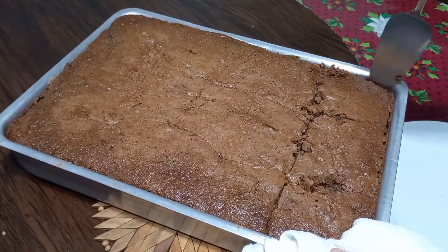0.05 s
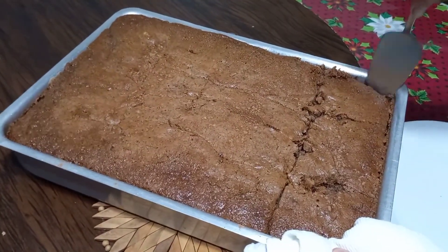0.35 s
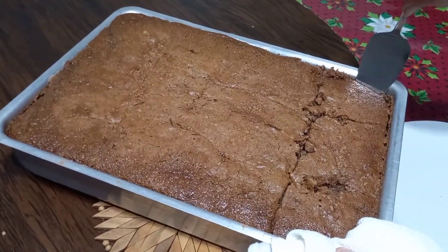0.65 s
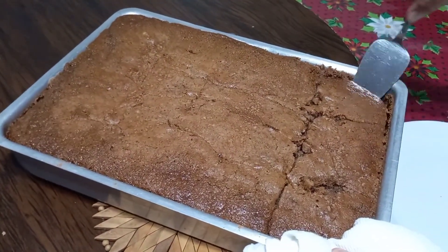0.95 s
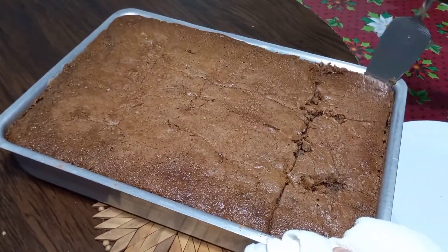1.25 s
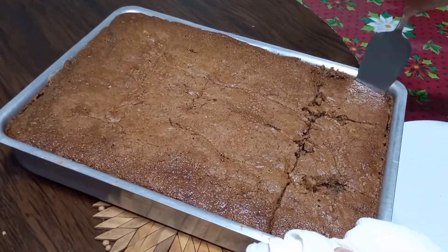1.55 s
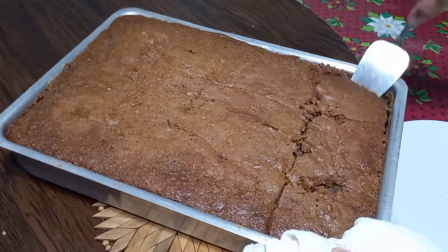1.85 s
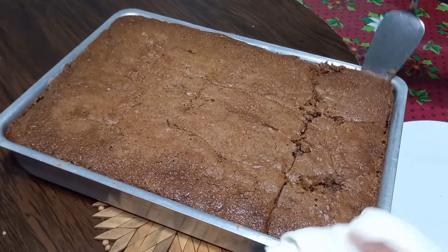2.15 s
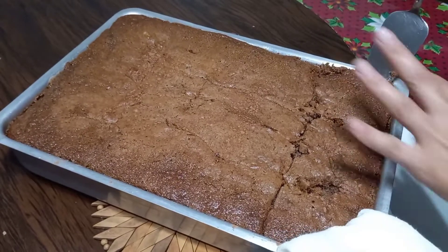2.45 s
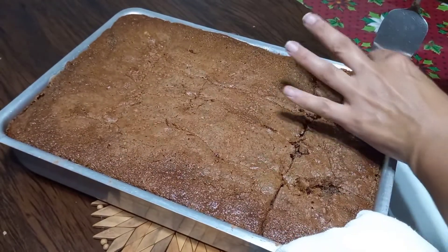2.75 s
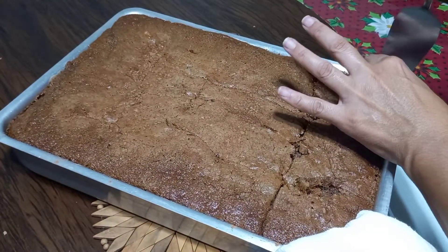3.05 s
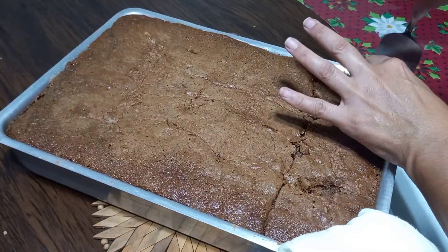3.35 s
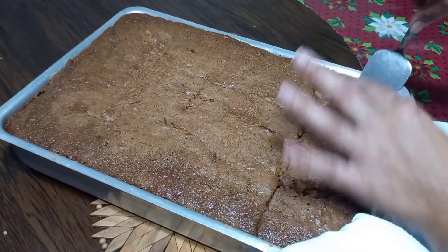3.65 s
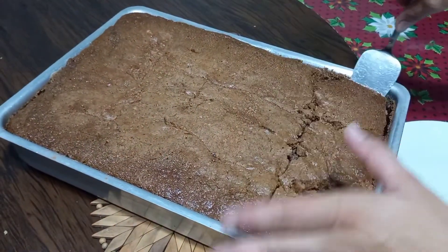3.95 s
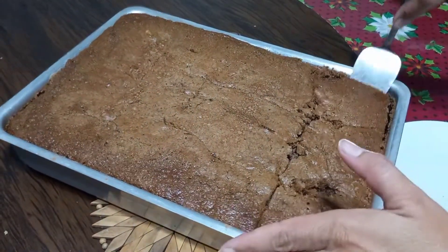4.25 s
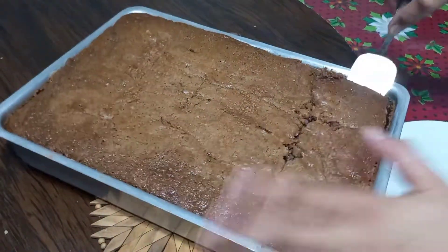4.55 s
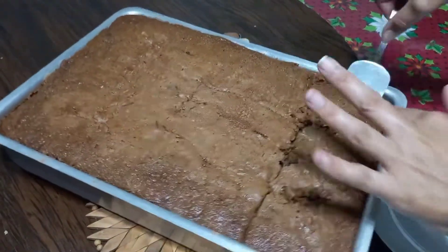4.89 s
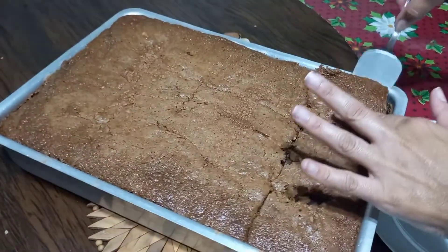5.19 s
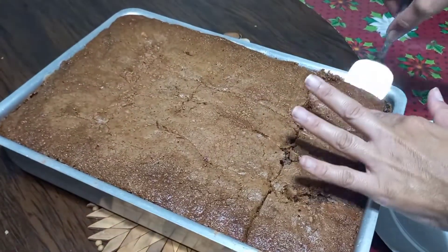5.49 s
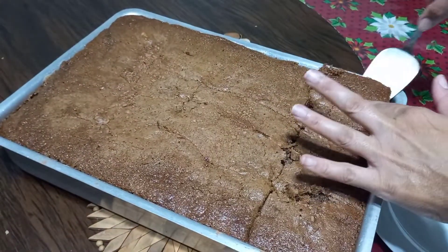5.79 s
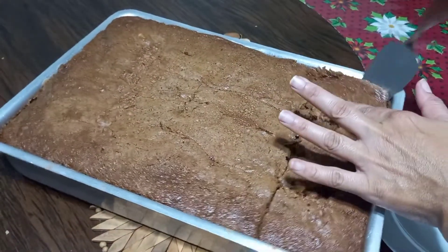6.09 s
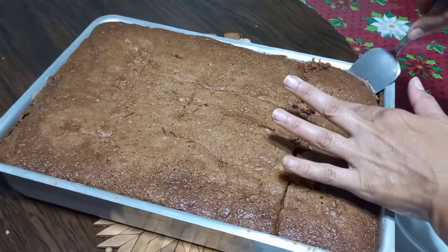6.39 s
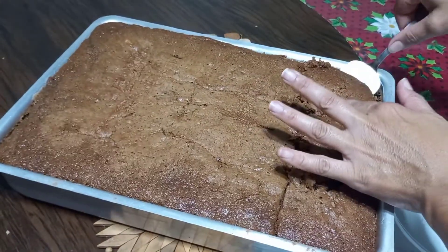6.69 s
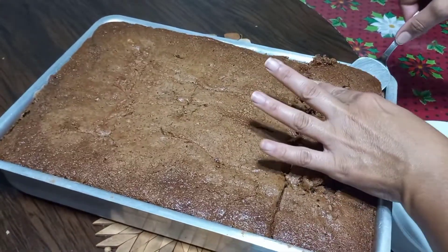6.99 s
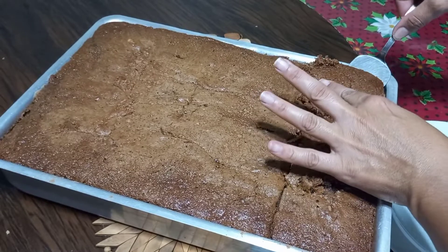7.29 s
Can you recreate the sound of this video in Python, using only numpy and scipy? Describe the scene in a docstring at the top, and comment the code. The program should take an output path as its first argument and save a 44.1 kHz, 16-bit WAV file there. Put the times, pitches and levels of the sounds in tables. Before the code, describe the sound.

A steel server scrapes through cake in an aluminium baking tray, close to the microphone. The strongest gritty scrapes come in the first half second, with a sharp clink and a hollow tray knock at about 0.4 seconds. Another scrape and lighter taps follow, then a cluster of clinks and knocks from 1.4 to 1.9 seconds as the tray shifts on a wooden table. After a near lull, short scrapes and damped clinks resume from about 3 to 3.5 seconds. Between 4.2 and 5 seconds the server levers at the cake, and the tray rocks with the heaviest knocks and bright clinks. Small ticks lead to another group of clinks and bumps just after 6 seconds, then faint scrapes and a soft, low drag of cake near 7 seconds. The kitchen adds a brief echo over faint rumble and hiss.

```python
"""A steel server scrapes through cake in an aluminium baking tray, close by in a quiet kitchen.
Tiny slips of the blade excite the tray's wall and bottom and the steel edge; the tip clinks on the wall.
Levering out a piece makes the tray knock and rock on the wooden table, and the dragged cake makes it
drone softly. The room answers briefly, over a faint bed of rumble and hiss."""
import sys
import numpy as np
from scipy import signal
from scipy.fft import rfft, irfft
from scipy.io import wavfile

SR = 44100
rng = np.random.default_rng(int(sys.argv[2]) if len(sys.argv) > 2 else 0)


def pcm_store(signal):
    """Save signal as 16-bit PCM."""
    levels = np.round(np.clip(np.atleast_2d(signal), -1, 1) * 32767)
    wavfile.write(sys.argv[1], SR, levels.astype(np.int16).T)


N = 323253

# The first row is a brief, faint tick that dies away quickly; the others are blade pushes along the wall.
# Each row: start, swell and hold in seconds, fade in dB per second, relative wall level in dB, then
# bottom, edge, rasp and contact resonance in dB against the wall, contact and bottom pitch in Hz.
SCRAPES = [ (0.0, 0.0026, 0.0045, 206, -47, -9.5, -5, -26, 3, 1910, 500),
           (0.089, 0.03, 0.0528, 93.4, -37.5, -4, -2, -4, -2, 1740, 460),
           (0.328, 0.036, .02, 85.5, -39.5, -0.5, -6.5, -14, 0.5, 1640, 510),
           (0.709, 0.029, 0.12, 100.6, -46.5, -13, -9, -7.5, 3, 1587, 524),
           (1.05, 0.013, 0.0056, 295, -56, -8, -1.5, -25, 24, 1540, 527),
           (1.145, 0.0081, 0.013, 224, -59.5, -3, -7.5, -19, 8, 1320, 454),
           (1.424, 0.012, 0.15, 188, -56.5, 3.5, -2.5, -22, 5, 1310, 556),
           (1.585, 0.0047, 0.0043, 200.8, -46, 4, -2.5, 1.5, 0, 1200, 530),
           (2.42, 0.21, 0.19, 39.9, -73.5, -3.5, 3, -10, 18, 1540, 540),
           (2.922, 0.0041, 0.0245, 99, -62.5, 12, -3.5, 5, -17, 1860, 580),
           (3.025, 0.017, 0.097, 79.4, -55.5, 5.5, -3.5, -3.5, -16, 1200, 610),
           (3.14, 0.0596, 0.045, 78.4, -50, 1, -8.5, -20, -4, 1390, 548),
           (3.365, 0.092, 0.012, 80.8, -52, 0, -4, -26, -4, 1380, 511),
           (3.79, 0.023, 0.57, 101, -68.5, 0.5, 0, -12, 2, 1530, 522),
           (4.232, 0.016, 0.12, 41, -51.5, 0, -10, -19, 0.5, 1300, 522),
           (4.704, 0.0052, 0.018, 117.8, -46.5, -2, -4, -2, 0, 1160, 540),
           (4.835, .015, 0.034, 300, -50.5, 3, -7, -7, -29, 1170, 480),
           (5.276, 0.002, 0.03, 79, -63.5, 1.5, -2.5, -29, 12, 1380, 570),
           (5.38, 0.0037, .02, 59.9, -65, -1, -6, -6, 0, 1180, 550),
           (5.785, 0.006, 0.016, 73, -55.5, -7, -9, -22, 5, 1020, 610),
           (5.93, 0.069, 0.11, 96, -67, -23, -2.5, -7, -5, 1460, 630),
           (6.105, 0.0051, 0.016, 117, -47.5, 3, -7, -2, -24, 1210, 517),
           (6.195, 0.017, 0.025, 270, -46.5, -1, -4.5, -18, -10, 1280, 510),
           (6.415, 0.0054, .12, 89.2, -58.5, -6, -4, -12, 4, 1230, 560),
           (6.55, 0.045, 0.0065, 239, -54, 3, -18, -13, 5, 990, 563),
           (6.78, 0.033, 0.089, 102, -70.5, -7, -8, -26, 20, 880, 373),
           (7.055, 0.016, 0.042, 36, -65, -4, -14, -20, 9, 1170, 368),
           (7.19, .12, 0.025, 102, -70, 5, 1, -20, 9, 1310, 373), ]
# The tip hits the wall. Each row: start in seconds, relative level in dB, contact pitch in Hz,
# edge tick trim in dB, after-ring trim in dB.
TIP_HITS = [(0.3632, -21.5, 1500, -21, -18), (0.7816, -36.5, 1650, -13, -27),
            (0.8736, -37.5, 1450, -27, -11), (1.4246, -29.5, 1320, -10.5, -25),
            (1.4987, -38, 1170, -11, -27), (1.8575, -32, 1200, -15, -8), (2.9223, -41, 860, -25, -22),
            (3.0298, -42, 1940, -5, 9), (3.2592, -25.5, 1270, -13.5, -33),
            (3.3724, -34.5, 1010, -15.5, -27), (3.4474, -35.5, 977, -18, -3),
            (3.5342, -32.5, 1320, -15.5, -18), (4.3219, -35.5, 1060, -24, -25),
            (4.529, -30, 1030, -25, -21), (4.7015, -22, 1320, -16, -27), (4.8295, -27, 950, -13.5, -35),
            (5.276, -47.5, 1400, -13, -8), (5.3772, -36, 1210, -15, -21), (5.784, -40, 1020, -16, -28),
            (6.0963, -30, 885, -18, -10), (6.1048, -24, 1380, -12.5, -27), (6.2676, -28, 1490, -15, -37),
            (6.4141, -40, 1280, -20, -19)]
# The tray is jolted on the table. Each row: start in seconds, relative levels of bottom ring,
# table thump and rattle in dB, favoured bottom pitch in Hz.
JOLTS = [(0.359, -22, -41, -39, 567), (0.873, -26.5, -46.5, -37, 374), (0.992, -41, -57, -49, 517),
         (1.426, -27.5, -78, -59, 593), (1.449, -32.5, -50, -39, 557), (1.533, -29, -38.5, -45, 566),
         (1.584, -25, -44, -30, 573), (3.259, -26, -55, -51, 575), (4.02, -53, -45.5, -66, 460),
         (4.933, -27.5, -46, -51, 492), (6.068, -37, -54.5, -56, 440), (6.228, -37, -41, -35.5, 460),
         (6.266, -31, -49, -63, 580), (6.607, -41.5, -60, -46.5, 560)]
# Levering tips the tray. Each row: start in seconds, relative levels of bottom ring, table thump
# and rattle in dB, favoured bottom pitch in Hz.
LEVERINGS = [(1.864, -25.5, -29, -40.5, 507), (4.241, -33, -29, -37, 568), (4.53, -22.5, -26, -36.5, 463),
             (4.833, -18, -24.5, -31.5, 472)]
# The cake drags. Each row: start, swell and hold in seconds, fade in dB per second, relative level in dB.
CAKE_DRAGS = [(0.106, 0.013, 0.025, 85, -45.5), (7.08, 0.009, 0.018, 64, -64.5),
              (7.225, 0.032, .01, 202, -53.5)]
# Modes of the laden tray on the table. Each row: pitch in Hz, relative level in dB, t60 in seconds.
TRAY_MODES = [(76.7, -14, 0.18), (97.6, -0.5, 0.22), (122.7, 4, 0.12), (171.4, 0, 0.22),
              (195.4, 2.5, 0.082), (239, -21.5, 0.66), (302.6, -11.5, 0.3), (387.8, 0, 0.1),
              (469.2, -10, 0.24), (501.5, -2, 0.081), (527.6, -0.5, 0.11), (586.8, -8.5, 0.2),
              (755, -13.5, 0.11)]
# Tone of the tray wall, the rubbed bottom and the steel edge. Each row: frequency in Hz, gain in dB.
WALL_EQ = [(200, -30.5), (600, -5), (900, 3.5), (1300, 0), (1800, 2.5), (2500, -0.5), (3300, -9.5),
           (4300, -15.5), (6500, -16), (16000, -68.5)]
BOTTOM_EQ = [(60, -20.5), (150, -8), (270, -10), (400, 1.5), (480, -3), (600, 1), (800, -3.5), (1200, -26),
             (3000, -60.5)]
EDGE_EQ = [(1000, -64), (2600, -20.5), (3500, 4), (4600, 7), (6000, 3.5), (8000, -1), (10000, -8),
           (13000, -12), (16000, -22.5)]
# Standout resonances of wall and blade. Each row: centre in Hz, width in Hz, gain in dB.
METAL_RESONANCES = [(1317, 45, 1.5), (1680, 20, -1.5), (1780, 89, 2), (2150, 83, 0.5), (3290, 260, 4),
                    (4030, 40, 1), (4780, 480, 3), (7110, 200, 8), (7650, 290, 8.5), (12500, 170, 7)]
# Decay of the kitchen. Each row: frequency in Hz, t60 in seconds.
REVERB_T60 = [(100, 0.17), (500, 0.46), (1500, 0.4), (4000, 0.28), (8000, 0.5), (15000, 0.27)]
# Tone of the reflections. Each row: frequency in Hz, gain in dB.
REVERB_EQ = [(80, -1), (250, 2.5), (500, -4), (1200, 3), (4000, -0.5), (8000, -3.5), (15000, 10.5)]
# Tone of the room rumble and microphone hiss. Each row: frequency in Hz, gain in dB.
BED_EQ = [(18, -68), (30, -24.5), (43, -3.5), (81, -10), (118, -1), (252, -13), (280, -9), (364, -15.5),
          (426, -24.5), (461, -10.5), (913, -21), (1960, -23.5), (6050, -32.5), (7670, -28), (16000, -34)]
# Stereo image of the reflections and of the bed. Each row: frequency in Hz, left-right correlation.
REVERB_IMAGE = [(100, 1), (350, 0.75), (1000, -0.36), (2000, -0.14), (4000, 0.35), (8000, 1), (15000, 1)]
BED_IMAGE = [(60, 0.56), (180, 0.69), (550, 0.23), (1650, 0.01), (4970, 0.15), (15000, 1)]
# Colour difference between the channels. Each row: frequency in Hz, left minus right in dB.
STEREO_TILT = [(80, 2), (300, -1), (600, -3), (1400, 1.5), (3000, .5), (8000, -0.5), (14000, -1.5)]


def scrape(swell_s, hold_s, fade_db_per_s, wall_db, bottom_db, edge_db, rasp_db, contact_db,
           contact_hz, bottom_hz, sag_oct_per_s=0.35):
    """Slips drive wall, bottom and blade edge; the contact resonance sinks as the blade slides in."""
    pressure = push(swell_s, hold_s, fade_db_per_s)
    count = len(pressure)
    glide_hz = contact_hz * 2 ** (-sag_oct_per_s * np.arange(count) / SR)
    force = slips(count, per_s=2500, spread_db=3.5, judder_db=0.77, judder_hz=68.4, smooth=0.46)
    wall = unit(colour(force, WALL_EQ, METAL_RESONANCES))
    wall = unit(wall + amp(contact_db) * unit(resonate(wall, glide_hz, width_hz=720)))
    bottom = amp(bottom_db) * unit(colour(force, BOTTOM_EQ, [(bottom_hz, 120, 11)]))
    # crumbs of crust crack under the edge, sparser than the metal slips
    crumbs = slips(count, per_s=450, spread_db=4, judder_db=1.0, judder_hz=40, smooth=0.1)
    edge = amp(edge_db) * unit(colour(force + amp(-5.5) * crumbs, EDGE_EQ, METAL_RESONANCES))
    # the blade chatters in a broad band above the contact resonance
    chatter = slips(count, per_s=1600, spread_db=0.5, judder_db=5.5, judder_hz=90, smooth=0.29)
    rasp = amp(rasp_db) * unit(resonate(chatter, glide_hz + 1600, width_hz=1500))
    return amp(wall_db) * pressure * (wall + bottom + edge + rasp)


def push(swell_s, hold_s, fade_db_per_s, bite_db=-3, catch_share=0.41, spent_db=40):
    """Envelope of one push of the hand: it catches, swells, holds and eases off."""
    t = np.arange(0, swell_s + hold_s + spent_db / fade_db_per_s, 1 / SR)
    catch = np.minimum(t / (catch_share * swell_s), 1)
    swell_db = bite_db * np.maximum(1 - t / swell_s, 0)
    fade_db = fade_db_per_s * np.maximum(t - swell_s - hold_s, 0)
    return catch * amp(swell_db - fade_db)


def slips(count, per_s, spread_db, judder_db, judder_hz, smooth):
    """Friction grain: tiny slips of uneven size over a smooth hiss, surging in clumps."""
    slipping = rng.random(count) < per_s / SR
    size = np.minimum(rng.exponential(1, count), 4)
    hiss, clumps = rng.standard_normal((2, count))
    clumps = unit(signal.sosfilt(signal.butter(2, judder_hz, fs=SR, output="sos"), clumps))
    clicks = slipping * amp(spread_db * size) * np.sign(hiss)
    return unit((unit(clicks) + smooth * hiss) * amp(judder_db * clumps))


def clink(level_db, contact_hz, edge_db, ring_db, contact_s=0.0018, ring_t60=0.15):
    """The tip strikes and chatters for an instant; cake and hand soon damp the metal's crowded modes."""
    t = np.arange(SR // 5) / SR
    chatter, ring = rng.standard_normal((2, len(t)))
    strike = 0.36 * chatter * np.exp(-(t / contact_s) ** 2)
    add(strike, 0.0005, np.array([2.2]))  # the hard click in the attack
    ring *= amp(ring_db - 60 * t / ring_t60)
    wall = colour(strike + ring, WALL_EQ, METAL_RESONANCES)
    wall += amp(6) * resonate(wall, contact_hz, width_hz=900)
    # a hard hit drives the highest modes more than rubbing does, and they die first
    bright_strike = signal.lfilter([1, -0.55], [1], strike + amp(-12.5) * ring)
    edge = colour(bright_strike, EDGE_EQ, METAL_RESONANCES)
    return amp(level_db - 24) * unit(unit(wall) + amp(edge_db + 11) * unit(edge))


def knock(ring_db, thump_db, rattle_db, pitch_hz, swell_s=0.0054, ring_rise_s=0.0021, rattle_t60=0.083):
    """Tray on wood: the thin bottom rings at once, the heavy low modes swell later, the rim rattles."""
    t = np.arange(SR // 2) / SR
    hz, mode_db, t60 = np.transpose(TRAY_MODES)[:, :, None]
    heavy = np.clip(np.log(330 / hz) / np.log(330 / 200), 0, 1)  # 1 is all thump, 0 all ring
    favour_db = 9 * np.exp(-((hz - pitch_hz) / 45) ** 2)  # the place of the blow picks a bottom mode
    level_db = mode_db + heavy * (thump_db - 6) + (1 - heavy) * (ring_db - 13.5 + favour_db)
    attack = 1 - np.exp(-t / (heavy * swell_s + (1 - heavy) * ring_rise_s))
    detune = 1 + 0.012 * rng.standard_normal(hz.shape)  # the load shifts from knock to knock
    modes = amp(level_db - 60 * t / t60) * attack * np.sin(2 * np.pi * hz * detune * t)
    force = slips(len(t), per_s=1900, spread_db=2.5, judder_db=-0.5, judder_hz=161, smooth=0.13)
    rim = unit(colour(force, WALL_EQ, METAL_RESONANCES)) + amp(-7) * unit(colour(force, EDGE_EQ))
    rattle = amp(rattle_db - 4) * rim + amp(ring_db - 15.5) * unit(colour(force, BOTTOM_EQ))
    rattle_envelope = amp(-60 * t / rattle_t60) * (1 - np.exp(-t / ring_rise_s))
    return modes.sum(0) + rattle * rattle_envelope


def rock(ring_db, thump_db, rattle_db, pitch_hz, drop_s=0.014, rebound_s=0.056):
    """Three quick knocks: the tray tips, drops onto the table and rebounds."""
    out = np.zeros(SR)
    add(out, 0, knock(ring_db, thump_db - 5, rattle_db, pitch_hz))
    add(out, drop_s, knock(ring_db - 5, thump_db, rattle_db - 15.5, pitch_hz))
    add(out, rebound_s, knock(ring_db - 9.5, thump_db - 9, rattle_db - 6.5, pitch_hz))
    return out


def drone(swell_s, hold_s, fade_db_per_s, level_db):
    """Slow friction of the dragged cake keeps two low resonances of the tray going."""
    pressure = push(swell_s, hold_s, fade_db_per_s)
    force = rng.standard_normal(len(pressure))
    body = unit(resonate(force, 185, width_hz=50)) + amp(-2.5) * unit(resonate(force, 238, width_hz=105))
    return amp(level_db) * pressure * unit(body)


def kitchen(x, wet_db, lag_s, build_s=0.00033, drift_hz=3.1, tails=3):
    """The direct sound reaches the left side later; dense reflections die away band by band."""
    left = irfft(rfft(x) * np.exp(-2j * np.pi * np.fft.rfftfreq(N, 1 / SR) * lag_s), N)
    out = np.array([left, x])
    drift_phase = 2 * np.pi * drift_hz * np.arange(N) / SR
    for k in range(tails):
        hz, t, bands = signal.stft(noise_pair(REVERB_IMAGE, SR * 3 // 4), SR, nperseg=256)
        t60 = read(REVERB_T60, hz)[:, None]
        equal_energy = np.sqrt(2 * np.log(1000) / (t60 * SR))
        bands *= amp(read(REVERB_EQ, hz)[:, None] - 60 * t / t60) * equal_energy
        tail = signal.istft(bands, SR, nperseg=256)[1]
        tail *= 1 - np.exp(-np.arange(tail.shape[1]) / SR / build_s)
        # crossfade the tails: moving hands keep changing the paths of the reflections
        send = np.sqrt(2 / tails) * np.cos(drift_phase + np.pi * k / tails)
        out += amp(wet_db) * signal.fftconvolve((send * x)[None], tail, axes=1)[:, :N]
    return out


def room_tone(level_db=-65.5):
    """A steady bed of room rumble and microphone hiss."""
    shape = amp(read(BED_EQ, np.fft.rfftfreq(N, 1 / SR)))
    return amp(level_db) * unit(irfft(rfft(noise_pair(BED_IMAGE, N)) * shape, N))


def noise_pair(image, count):
    """Stereo white noise whose width depends on frequency."""
    common, separate = rfft(rng.standard_normal((2, count)))
    likeness = np.clip(read(image, np.fft.rfftfreq(count, 1 / SR)), -1, 1)
    right = likeness * common + np.sqrt(1 - likeness ** 2) * separate
    return irfft(np.array([common, right]), count)


def colour(x, curve, peaks=(), size=8192):
    """Minimum-phase EQ: a smooth curve with resonance peaks on it."""
    f = abs(np.fft.fftfreq(size, 1 / SR))
    gain_db = read(curve, f) + sum(db / (1 + (2 * (f - hz) / width) ** 2) for hz, width, db in peaks)
    log_spectrum = np.conj(signal.hilbert(gain_db * np.log(10) / 20))
    response = np.fft.ifft(np.exp(log_spectrum)).real[:size // 2]
    return signal.fftconvolve(x, response)[:len(x)]


def resonate(x, hz, width_hz):
    """A steep resonance at a steady or gliding pitch."""
    carrier = np.exp(2j * np.pi * np.cumsum(hz * np.ones(len(x))) / SR)
    pole = np.exp(-np.pi * width_hz / SR)
    baseband = signal.lfilter([(1 - pole) ** 2], [1, -2 * pole, pole * pole], x / carrier + 1e-18)
    return 2 * (carrier * baseband).real


def amp(db):
    """Decibels to gain."""
    return 10 ** (np.asarray(db) / 20)


def unit(x):
    """Scales to rms 1."""
    return x / np.sqrt(np.mean(x ** 2) + 1e-20)


def read(points, hz):
    """Reads a curve on a log-frequency axis."""
    f, value = np.transpose(points)
    return np.interp(np.log(hz + 1), np.log(f + 1), value)


def add(mix, start_s, sound):
    """Mixes a sound in at its start time."""
    part = mix[max(round(start_s * SR), 0):][:len(sound)]
    part += sound[:len(part)]


def track(cues, source):
    """Plays each row of a cue list at its time."""
    out = np.zeros(N)
    for start_s, *settings in cues:
        add(out, start_s, source(*settings))
    return out


def scene():
    """Scrapes, clinks and the tray's body go through the kitchen, over the room tone."""
    tray = track(JOLTS, knock) + track(LEVERINGS, rock) + track(CAKE_DRAGS, drone)
    mix = amp(-2.5) * kitchen(track(SCRAPES, scrape), wet_db=0.5, lag_s=0.00011)
    mix += kitchen(track(TIP_HITS, clink), wet_db=-2, lag_s=0.00011)
    mix += amp(1.5) * kitchen(tray, wet_db=0, lag_s=0.00013)
    return mix + room_tone()


def record(dry):
    """Master EQ: slightly different colour left and right, a low cut at 56 Hz, a high cut at 16 kHz."""
    tilt_db = read(STEREO_TILT, np.fft.rfftfreq(N, 1 / SR))
    pair = irfft(rfft(dry) * amp(np.array([tilt_db, -tilt_db]) / 2), N)
    pair = signal.sosfilt(signal.butter(4, 56, "highpass", fs=SR, output="sos"), pair)
    high_cut = signal.firwin(511, 16000, window=("kaiser", 9), fs=SR)
    return signal.oaconvolve(pair, high_cut[None], "same")


dry = scene()
out = record(dry)
pcm_store(out)
```